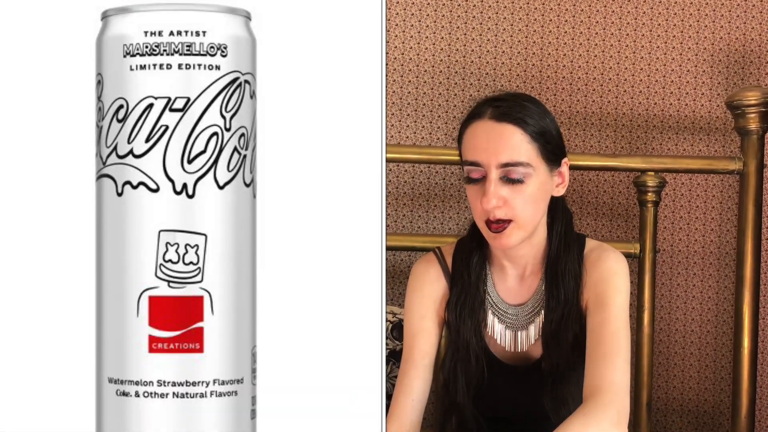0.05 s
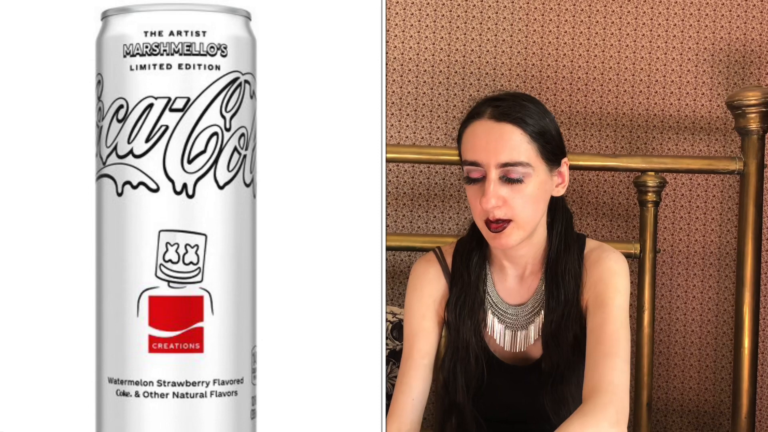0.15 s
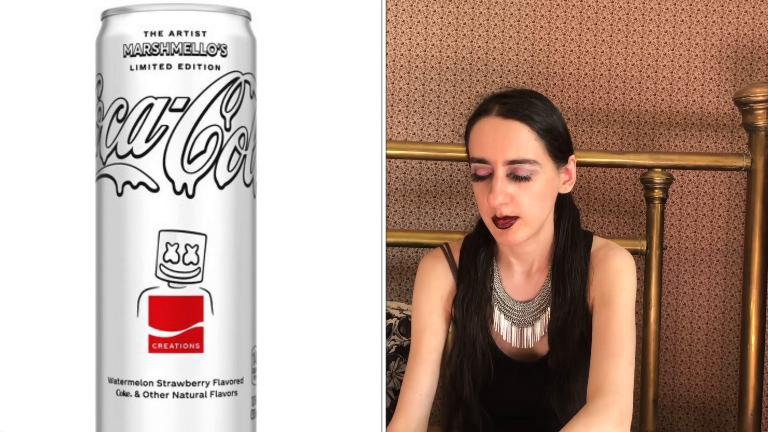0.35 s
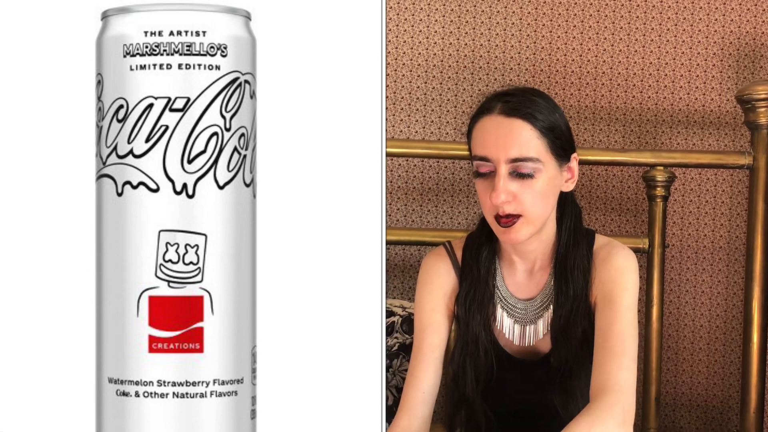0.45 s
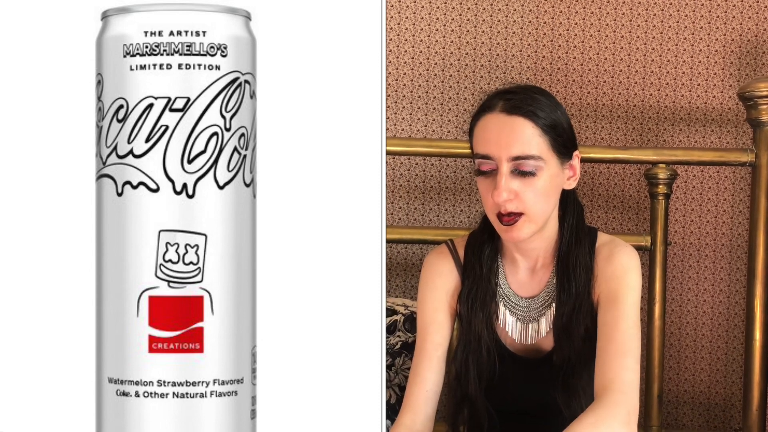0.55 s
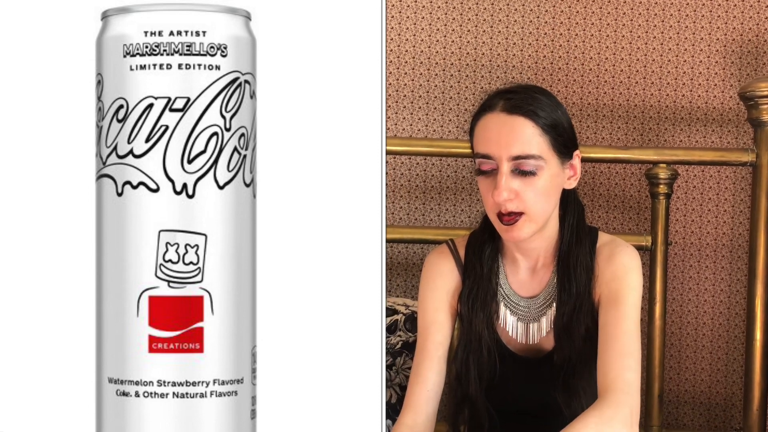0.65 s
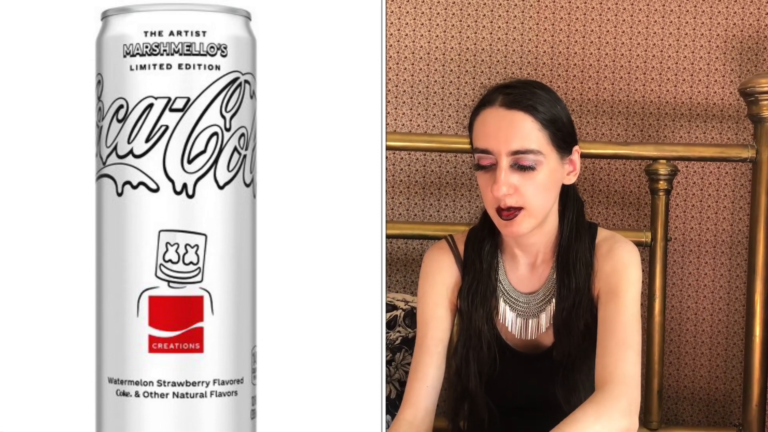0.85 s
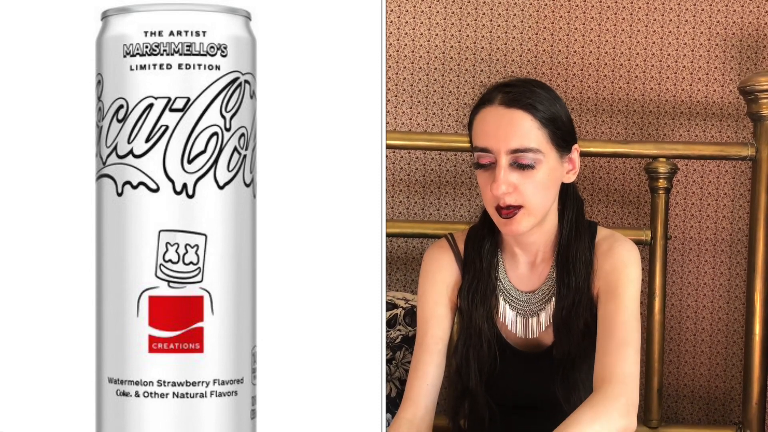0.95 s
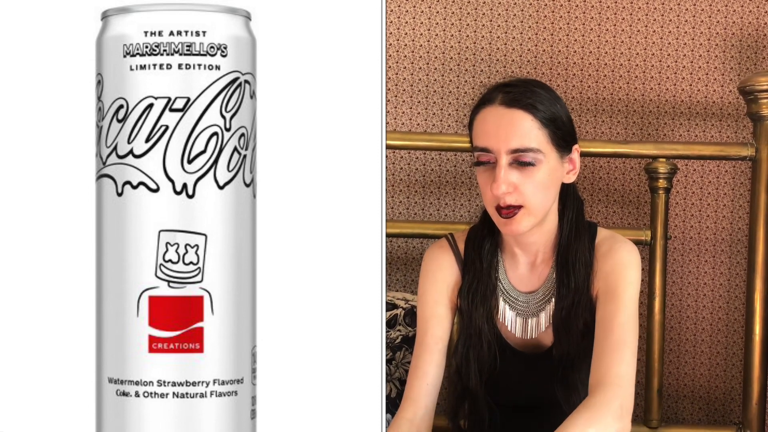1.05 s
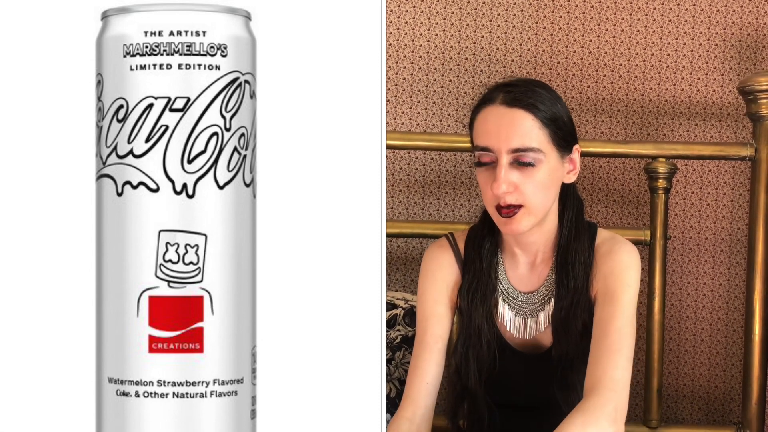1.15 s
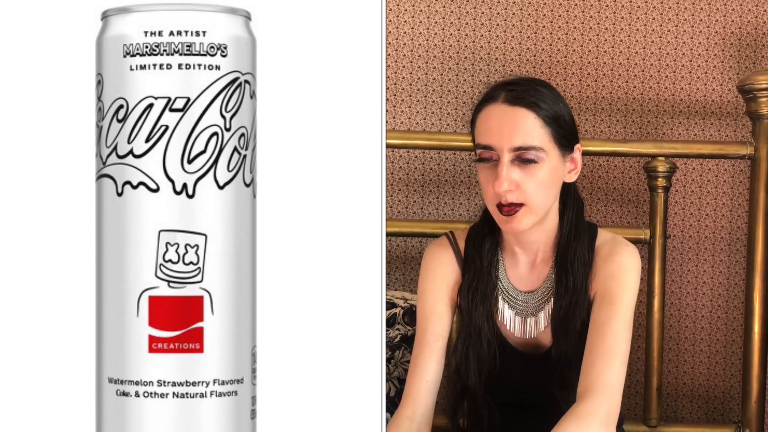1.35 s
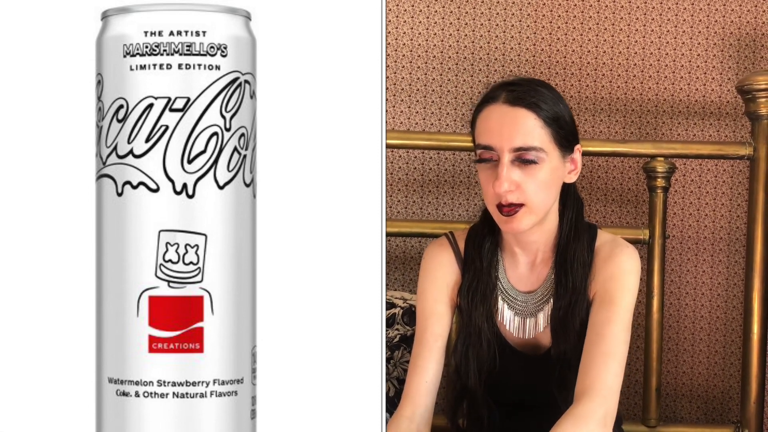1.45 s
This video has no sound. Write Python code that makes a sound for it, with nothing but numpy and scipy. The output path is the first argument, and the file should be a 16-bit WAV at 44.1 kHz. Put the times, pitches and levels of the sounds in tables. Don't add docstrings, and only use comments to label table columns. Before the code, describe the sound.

A fizzy drink can is opened close up in a small room with a soft low motor hum. At 0.2 s the seal cracks and bright gas hisses, fading by 0.37 s, with a loud double tearing snap near 0.33 s. Another hard crack comes at 0.62 s, and the flap snaps inward at 0.88 s. Small clicks follow around 1.1 s, a sharper tick at 1.29 s and a faint one at 1.49 s. The loudest cracks distort.

```python
import sys
import numpy as np
from scipy import signal
from scipy.fft import rfft, irfft, next_fast_len
from scipy.io import wavfile
from scipy.ndimage import map_coordinates

SR = 44100
rng = np.random.default_rng(int(sys.argv[2]) if len(sys.argv) > 2 else 0)


def gain_from_db(level_db):
    decades = np.asarray(level_db, float) / 20
    return 10 ** decades


def unload_wav(signal):
    wavfile.write(
        sys.argv[1],
        SR,
        np.round(np.clip(np.atleast_2d(signal).T, -1, 1) * 32767).astype(np.int16),
    )


N = 66150

# (frequency [Hz], level [dB rms])
HUM_PARTIALS = [(58.2, -41.5), (116.4, -53), (232, -60.5), (355, -58.5)]
# (time [s], level [dB])
MOTOR_LOAD = [(0, 4), (.55, 3.5), (.7, 1), (1.5, 1.5)]
# (frequency [Hz], density [dB per Hz])
AIR_SPECTRUM = [(30, -10.5), (80, 2), (330, -1), (700, -8), (1300, -10.5), (2200, -22.5), (5000, -28),
                (16000, -37.5)]
# (time [s], level [dB], push length [s], focus [Hz], fall from focus [dB/octave])
TAB_TICKS = [
    (.184, -48, 0.00033, 6100, 5.4),
    (.190, -51, 0.00085, 5740, 7.6),
    (.2056, 7.5, 0.0011, 6400, 4.3),
    (.568, -40, .0004, 9000, 2.5),
    (1.2556, -47, 0.0002975, 9000, 4.3),
    (1.274, -47.5, .0003, 8400, 2.5),
    (1.284, -29.5, 0.0003, 7000, 1.8),
    (1.2905, -10.5, 0.00054, 6500, 1),
    (1.494, -31, 0.00071, 6000, 2.5),
]
# (frequency [Hz], level [dB], t60 [s])
TAB_MODES = [(1700, -16, .003), (2600, -9, .004), (3700, -11, .003), (4950, -3, .005), (5500, -1, .005),
             (6100, -3, .004), (6700, -6, .004), (7550, -4, .005), (8450, -10, .003), (11000, -14, .002),
             (14300, -13, .003)]
# (time [s], level [dB])
GAS_FLOW = [
    (.2055, -57.5),
    (.207, -12.5),
    (.213, -10.5),
    (.22, -3),
    (.25, -5.5),
    (.29, -8),
    (.32, -13.5),
    (.345, -18),
    (.37, -45),
]
# (frequency [Hz], density [dB per Hz])
JET_SPECTRUM = [(180, -54.5), (300, -33), (978, -18.5), (2250, -20), (2740, -13), (3350, -11), (9550, -1.5),
                (13500, -3.5), (16000, -7.5)]
# (frequency [Hz], width [Hz], peak gain [dB])
SLIT_WHISTLES = [(6160, 350, 3.5), (6500, 348, 4.5), (8430, 230, 5.5), (9780, 200, 7), (12600, 540, 1.5),
                 (13500, 500, 7.5)]
# (time [s], level [dB], tear length [s], focus [Hz], fall from focus [dB/octave])
LID_CRACKS = [
    (.3257, 3, .0014, 3400, 4),
    (.3387, 2, .0006, 4000, 9),
    (.598, -39, .001, 5000, 1),
    (.6105, -42, .001, 3000, 2.5),
    (.6191, -13, .0008, 3000, 1.5),
    (.6206, 12, .003, 3600, 1.5),
]
# (frequency [Hz], level [dB], t60 [s])
LID_MODES = [(348, -31, .015), (869, -15, 0.0043), (1580, -29, .006), (2000, -28, 0.0057),
             (2892, -3, 0.0043), (3225, -8, 0.0076), (3725, 0, 0.0037), (4052, -3, .008),
             (4500, -4.5, 0.0051), (5440, -5, 0.0022), (6056, -5.5, 0.0056), (8645, 0, 0.0017),
             (11900, -7, 0.0021), (13600, -10, 0.00073)]
# (time [s], level [dB], frequency [Hz], t60 [s])
CAN_AIR = (.3259, -25, 530, .14)
# (time [s], level [dB], push length [s], focus [Hz], fall from focus [dB/octave])
FLAP_FOLDS = [
    (.854, -36.5, .0006, 4500, 4.2),
    (.866, -37.5, 0.00077, 4500, 4.4),
    (.8777, 11, 0.0029, 3800, 3.8),
    (1.049, -30, .0006, 4500, 2.7),
    (1.081, -36, 0.00084, 3500, 3.2),
    (1.0834, -7, 0.0011, 6500, 2.6),
    (1.1057, -16, .0005, 7000, 0.98),
]
# (frequency [Hz], level [dB], t60 [s])
FLAP_MODES = [(350, -12, 0.012), (1133, -14, .01), (2655, -5.5, 0.0083), (3713, 0, 0.0072),
              (4050, 0, 0.0039), (4313, -5, 0.009), (5095, -6.5, .005), (5527, -4, 0.0091),
              (6200, 0, 0.0023), (7470, -5, .004), (8830, -7.5, 0.0018), (12100, -8, .002),
              (14000, -14, 0.0024)]
# (delay [s], level [dB])
WALL_ECHOES = [(.0045, -15), (.0075, -16.5), (.0095, -14.5), (0.013, -14.5), (0.0132, -19), (.018, -24),
               (.024, -20)]
# (frequency [Hz], t60 [s])
ROOM_DECAY = [(300, 0.48), (800, 0.17), (2000, 0.29), (4000, 0.31), (7000, 0.24), (10000, .22),
              (15000, 0.21)]

ROOM_METAL_DB, ROOM_JET_DB, ROOM_RISE_S = -9.5, -9, 0.0024
AIR_DB = -45
SPUTTER_DB = 1.5
MODE_SCATTER_DB = 1.5
LOW_CUT_HZ = 520


def unit(x):
    return x / np.sqrt(np.mean(x ** 2) + 1e-20)


def along(points, hz):
    f, value = np.transpose(points)
    return np.interp(np.log(hz + 1), np.log(f + 1), value)


def curve(rows):
    s, value = np.transpose(rows)
    return np.interp(np.arange(N) / SR, s, value, left=value[0], right=value[-1])


def wobble(rate_hz):
    knots = rng.standard_normal(int(N * rate_hz / SR) + 4)
    return map_coordinates(knots, [np.arange(N) * rate_hz / SR])


def filtered(x, response):
    size = next_fast_len(N + SR // 2)
    spectrum = rfft(x, size) * response(np.fft.rfftfreq(size, 1 / SR))
    return irfft(spectrum, size)[:N]


def room_tail():
    hz, t, z = signal.stft(rng.standard_normal(SR // 2), SR, nperseg=256)
    decay = gain_from_db(-60 * t / along(ROOM_DECAY, hz)[:, None])
    tail = signal.istft(z * decay, SR, nperseg=256)[1]
    tail_s = np.arange(len(tail)) / SR
    tail = tail * (1 - np.exp(-(tail_s / ROOM_RISE_S) ** 2))
    return tail / np.linalg.norm(tail)


def wall_echoes(walls_db):
    echoes = np.zeros(SR // 20)
    delays = [round(delay_s * SR) for delay_s, _ in WALL_ECHOES]
    levels_db = [db + walls_db for _, db in WALL_ECHOES]
    echoes[delays] = gain_from_db(levels_db + rng.normal(0, 1, len(WALL_ECHOES)))
    echoes = np.convolve(echoes, [.3, .4, .3])
    echoes[0] = 1
    return echoes


def jagged_push(length_s, size):
    shape = np.exp(-(np.arange(size) / SR / length_s) ** 2)
    push = rng.standard_normal(size) * shape
    for _ in range(4):
        z = rfft(push)
        push = irfft(z / (np.abs(z) + 1e-9), size) * shape
    return push


def struck(events, modes, walls_db):
    out = np.zeros(N + SR)
    t = np.arange(SR // 20) / SR
    hz, mode_db, t60_s = np.transpose(modes)[:, :, None]
    side = (-1.) ** np.arange(len(modes))[:, None]
    thin = signal.butter(2, LOW_CUT_HZ, "high", fs=SR, output="sos")
    for start_s, db, length_s, focus_hz, fall_db in events:
        octaves = np.abs(np.log2(hz / focus_hz))
        start_db = mode_db - fall_db * octaves + MODE_SCATTER_DB * rng.standard_normal(hz.shape)
        partials = side * gain_from_db(start_db - 60 * t / t60_s) * np.sin(2 * np.pi * hz * t)
        ring = signal.sosfilt(thin, np.sum(partials, axis=0))
        blow = np.convolve(jagged_push(length_s, size=440), ring)
        blow = gain_from_db(db) * blow / np.abs(blow).max()
        near = signal.fftconvolve(blow, wall_echoes(walls_db))
        sent = ring / np.linalg.norm(ring) * np.linalg.norm(blow)
        far = signal.fftconvolve(sent, gain_from_db(ROOM_METAL_DB) * room_tail())
        start = round(start_s * SR)
        out[start:][:len(near)] += near
        out[start:][:len(far)] += far
    return out[:N]


def background():
    t = np.arange(N) / SR
    hum = np.zeros(N)
    for hz, db in HUM_PARTIALS:
        level = np.sqrt(2) * gain_from_db(db + 0.59 * wobble(2.7))
        phase = rng.uniform(0, 4.5) + .15 * wobble(2.2)
        hum += level * np.sin(2 * np.pi * hz * t + phase)
    air = unit(filtered(rng.standard_normal(N), lambda f: gain_from_db(along(AIR_SPECTRUM, f))))
    return gain_from_db(curve(MOTOR_LOAD)) * hum + gain_from_db(AIR_DB + .8 * wobble(15)) * air


def tab_ticks():
    return struck(TAB_TICKS, TAB_MODES, walls_db=-6)


def jet_response(f):
    whistle = 1
    for centre_hz, width_hz, db in SLIT_WHISTLES:
        whistle = whistle + (gain_from_db(db) - 1) / (1 + ((f - centre_hz) / width_hz * 2) ** 2)
    return gain_from_db(along(JET_SPECTRUM, f)) * whistle


def gas_jet():
    t = np.arange(N) / SR
    jet = unit(filtered(rng.standard_normal(N), jet_response))
    shut = (t < GAS_FLOW[0][0]) | (t > GAS_FLOW[-1][0])
    flow_db = curve(GAS_FLOW) - 60 * shut
    direct = jet * gain_from_db(flow_db + SPUTTER_DB * wobble(250) + 0.4 * wobble(40))
    return direct + gain_from_db(ROOM_JET_DB) * signal.fftconvolve(direct, room_tail())[:N]


def lid_cracks():
    return struck(LID_CRACKS, LID_MODES, walls_db=-2.5)


def can_air():
    start_s, db, hz, t60_s = CAN_AIR
    t = np.maximum(np.arange(N) / SR - start_s, 0)
    return gain_from_db(db - 60 * t / t60_s) * np.sin(2 * np.pi * hz * t)


def flap_folds():
    return struck(FLAP_FOLDS, FLAP_MODES, walls_db=-2.5)


def scene():
    metal = lid_cracks() + flap_folds() + tab_ticks()
    return (background() + gas_jet() + metal + can_air())[None]


def low_pass(x):
    return signal.sosfilt(signal.butter(12, 16220, fs=SR, output="sos"), x)


def record(dry):
    knee, top_hz = 21, 15950
    x = dry[0]
    x = x / (1 + np.abs(x) ** knee) ** (1 / knee)
    mix = filtered(x, lambda f: 1 / (1 + (f / top_hz) ** 120))[None]
    return low_pass(mix)


dry = scene()
out = record(dry)
unload_wav(out)
```